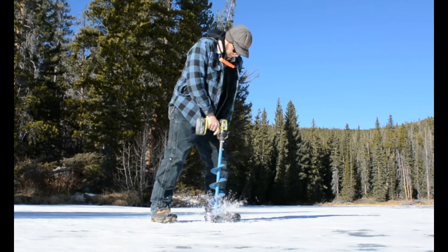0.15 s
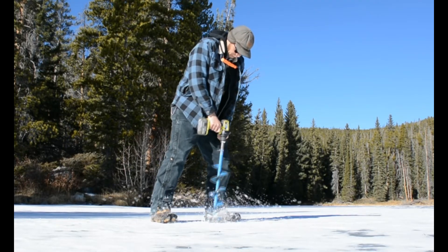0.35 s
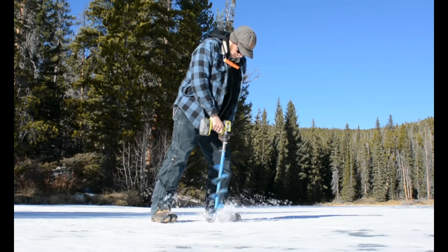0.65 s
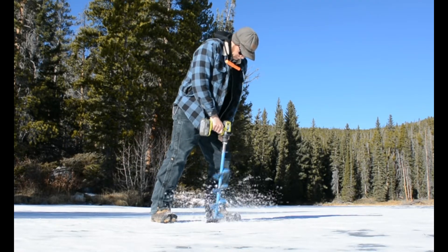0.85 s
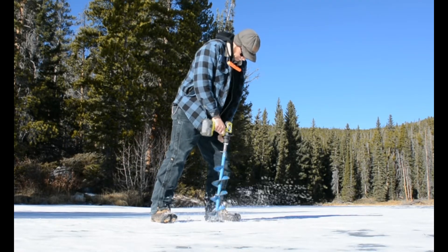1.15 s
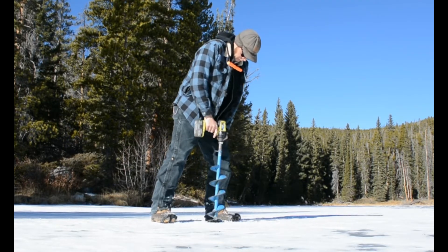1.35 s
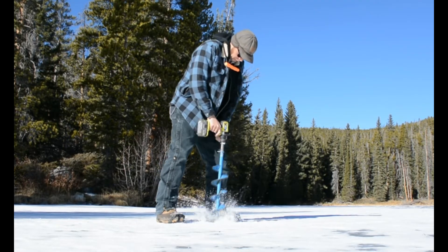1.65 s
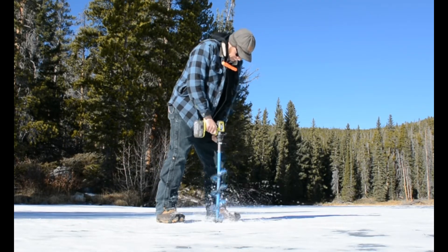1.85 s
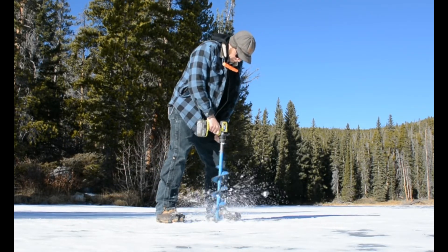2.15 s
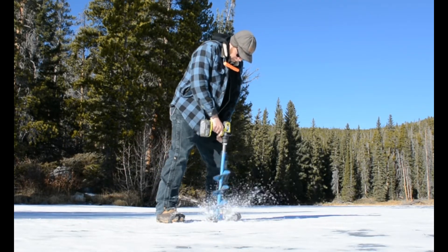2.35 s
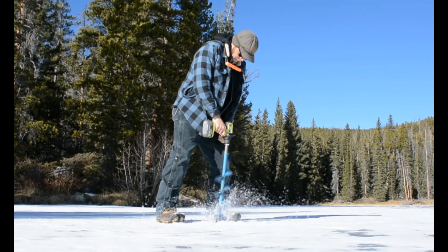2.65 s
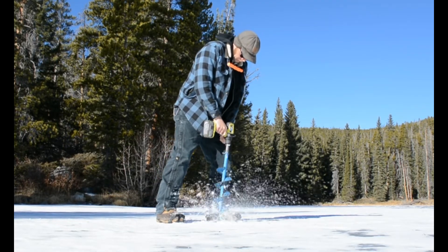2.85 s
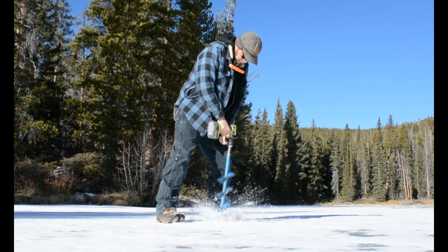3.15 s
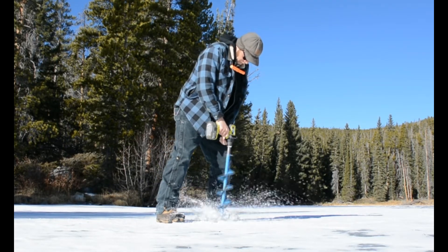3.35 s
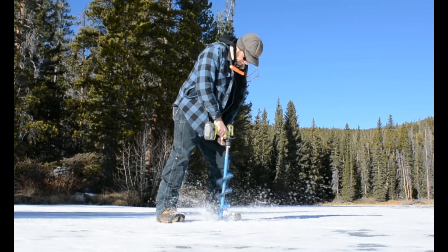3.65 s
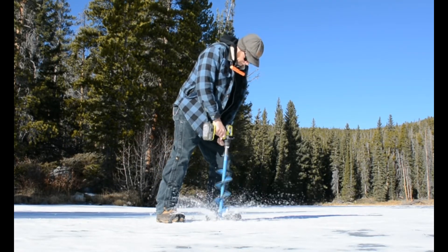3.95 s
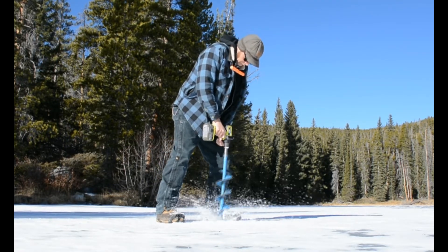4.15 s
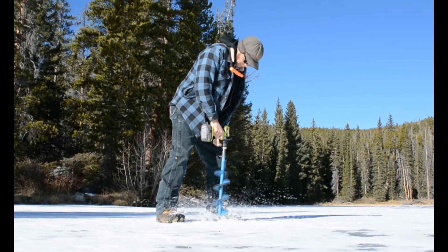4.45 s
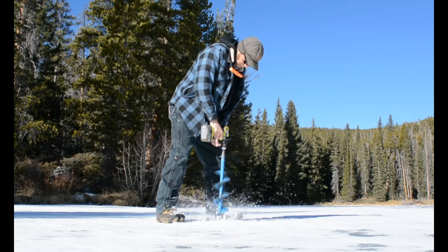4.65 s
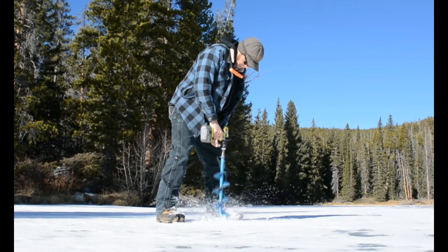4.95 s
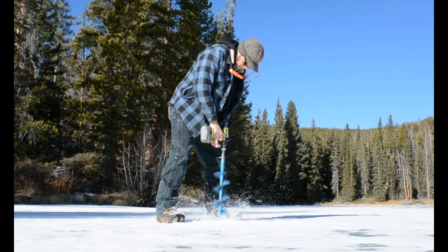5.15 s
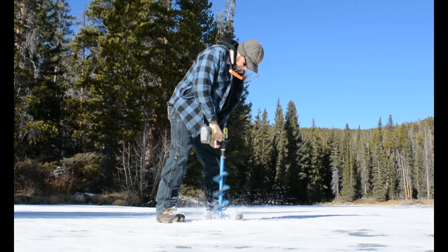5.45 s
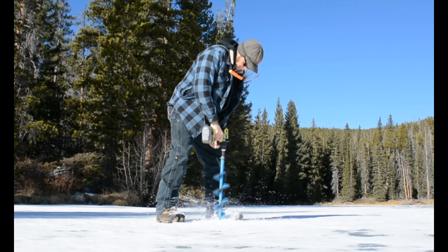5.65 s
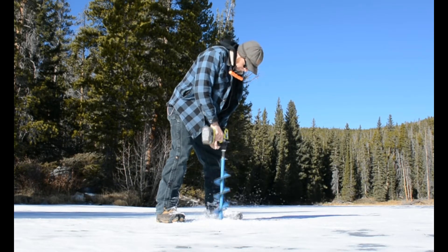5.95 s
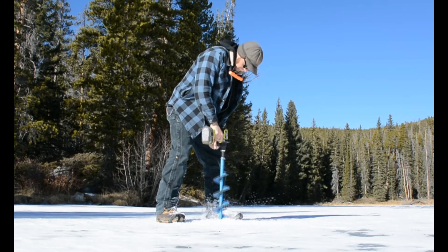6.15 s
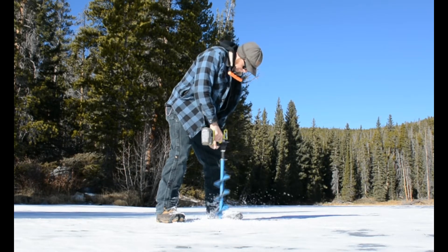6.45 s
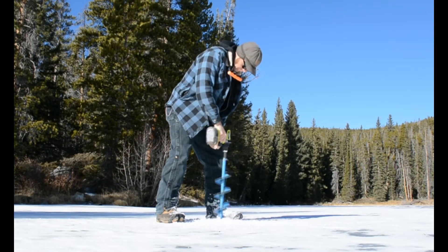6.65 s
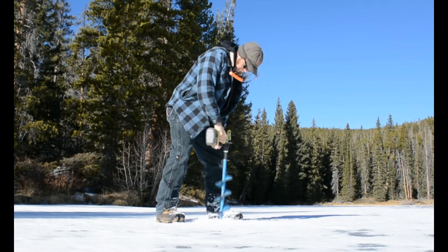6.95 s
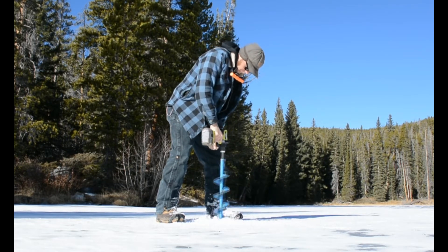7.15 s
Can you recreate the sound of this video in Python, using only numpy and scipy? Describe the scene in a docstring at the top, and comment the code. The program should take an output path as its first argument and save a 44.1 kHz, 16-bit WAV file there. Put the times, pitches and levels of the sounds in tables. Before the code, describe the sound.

A cordless impact drill rattles a steel auger into lake ice, nine short bursts and then one long grinding run, outdoors.

```python
"""On a frozen lake by a forest, a cordless impact drill drives a steel auger into the ice.
The trigger gets nine short pulls, then one long run. The hammer strikes about 88 times a second and rattles
the steel, noise bursts make the shaved ice, and the blades groan as they catch and at each half turn.
The blows ring the air in the hole, lower and lower through the long run.
Clanks, thuds and a shifting boot fill the gaps, and the forest sends back a faint wash."""
import sys
import numpy as np
from scipy import signal
from scipy.io import wavfile

SR = 44100
rng = np.random.default_rng(int(sys.argv[2]) if len(sys.argv) > 2 else 0)


def store_wav(level_fs):
    """Save 16-bit WAV to argv[1]."""
    pcm = np.round(np.clip(np.atleast_2d(level_fs), -1, 1) * 32767)
    wavfile.write(sys.argv[1], SR, pcm.T.astype(np.int16))


N = 321930
T = np.arange(N) / SR  # time of every sample, s

# Levels in the tables are starting points: the functions add their own gains.
# Pulls of the trigger, the last being the long run: pressed t/s, let go t/s, hammer level/dB,
# ice shaving level/dB, hole ring level/dB, change while the finger eases level/dB, starting squeal level/dB
TRIGGER_PULLS = [(-0.1, 0.13, -18.5, -21.5, -27, -6.5, -15.5), (0.234, 0.42, -17.5, -19.5, -29, -10, -15),
                 (0.516, 0.66, -17, -19, -30.5, -4, -13.5), (0.782, 0.93, -17.5, -18.5, -23.5, -2, -14.5),
                 (1.056, 1.074, -25, -17, -23.5, -2, -15.5), (1.429, 1.631, -20.5, -18, -25.5, -1.5, -11.5),
                 (1.772, 1.982, -19, -21, -30.5, -2, -10.5),
                 (2.125, 2.3285, -19.5, -22.5, -26, -4.5, -12.5),
                 (2.45, 2.756, -20, -20.5, -22.5, -0.5, -14), (2.856, 7.4, -20, -19, -21, 3, -14.5)]
# Hammer blows before the load sways them: t/s, blow rate f/Hz
BLOW_RATE_CURVE = [(0, 88), (2.6, 88.5), (3.05, 81), (3.38, 93), (3.9, 87.8), (4.9, 85.5), (5.7, 85.7),
                   (6.4, 89), (7, 89.5), (7.3, 94)]
# The deepening hole: t/s, air resonance before the load sways it f/Hz, lower resonance level/dB,
# boom of the ice sheet level/dB
HOLE_CURVE = [(0, 692, -4, -5.5), (2.25, 710, -6, -5.5), (2.7, 755, -16, -14), (3.6, 747, -27, -19.5),
              (5.0, 680, -37, -28), (5.7, 671, -15.5, -34), (7.3, 659, -7, -17.5)]
# Load at full swing over a half turn: share of the half turn, knock level/dB, chatter level/dB, hole level/dB,
# factor on the hole's pitch, factor on the blow rate
HALF_TURN_LOAD = [(0.02, -3.5, -1, 0, .99, 0.995), (.2, -5, -3, 0.5, .96, .97),
                  (.43, 1.5, 1, -1.2, .99, .985), (.65, 6, -1, 1, 1.09, 1.025),
                  (.85, 1, -1.5, -0.5, 1.05, 1.025)]
# The loose auger clanks in the chuck: t/s, level/dB, decay t/s
CHUCK_CLANKS = [(0.746, -30, 0.026), (1.163, -45, 0.033), (1.211, -30.5, 0.013), (1.365, -32.5, 0.016)]
# Dull thuds on the ice, from a boot or a falling lump: t/s, level/dB
ICE_THUDS = [(1.281, -15.5), (1.286, -22), (1.328, -12), (1.336, -24), (1.516, -15)]
# Modes of the auger and the drill: f/Hz, width f/Hz, level/dB
STEEL_MODES = [(764, 96, 5), (1072, 61, 4), (1191, 54, 7), (1455, 89, 6), (1784, 13, 4), (2103, 266, 5.5),
               (2580, 97, 3), (2880, 170, -5.5), (3640, 90, -6.5), (4734, 145, -4), (6350, 160, -17),
               (7360, 21, -2), (6760, 33, -4.5), (11360, 550, -24)]
# Long rings of the auger's flights: f/Hz, level/dB, time to fall 60 dB t/s
FLIGHT_RINGS = [(829, -2, .45), (1793, -4, .1), (2353, -12, .2), (3278, -14, .2), (4474, -12, .2)]
# Spectrum of ice being shaved: f/Hz, level per Hz/dB
SHAVING_SPECTRUM = [(60, -20), (115, -17), (175, 1.5), (270, 0.5), (430, 0.5), (900, 9.5), (1500, 13),
                    (2600, 10.5), (4000, 4), (5500, 1.5), (7400, -1.5), (8300, -14), (12500, -5.5),
                    (15800, -35)]
# Spectrum of the forest's echo: f/Hz, level per Hz/dB
FOREST_SPECTRUM = [(100, -1.5), (300, 0.5), (800, -13), (2000, -18), (4000, -21), (8000, -22.5),
                   (15000, -23)]
# Spectrum of the still air: f/Hz, level per Hz/dB
AIR_SPECTRUM = [(20, -11), (60, 1), (110, 0.5), (300, -17.5), (900, 2), (2500, -46), (6000, -28),
                (15000, -38)]
# The auger leans and scrapes the wall hard: t/s, level/dB
HARD_SCRAPES = [(3.235, -32), (3.547, -28), (6.115, -28), (6.293, -28.5), (6.582, -24.5), (6.757, -25),
                (6.974, -26), (7.185, -21)]
# Change through the long run as the auger sinks: t/s, hammer level/dB, ice shaving level/dB, hole ring level/dB
SINKING_CURVE = [(2.9, 3, 1.5, 1), (3.3, -1, -3, -3), (4.05, -0.5, -8, 3.5), (4.8, -3, -6.5, 5.5),
                 (5.6, -2.5, -6.5, 6), (6.5, -2.5, -6.5, 5.5), (7.3, -3.5, -4, 4.5)]
# The auger's rotation in the long run: t/s, half turns made
HALF_TURNS_MADE = [(3.02, 0), (3.83, 5), (4.695, 10), (5.6, 15), (6.455, 20), (7.335, 25)]
# Bite of a blade at each half turn, before its unevenness: t/s, level/dB, groan f/Hz
BITE_CURVE = [(3.0, -16, 1330), (3.7, -13, 970), (4.9, -9, 1015), (6.1, -11, 994), (7.2, -11.5, 1230)]
# A blade catches on the fresh ice and groans: t/s, level/dB, groan f/Hz
BLADE_CATCHES = [(0.391, -12, 1650), (1.0774, -14, 1190), (1.4557, -25, 1550), (1.5244, -16, 1260),
                 (2.4894, -9.5, 1490), (2.7312, -14, 1420), (3.1686, -7.5, 1170)]
# The drive squeals as it strains or catches at a touch of the trigger:
# t/s at the loudest, level/dB, f/Hz, length before stretching t/s
DRIVE_STRAINS = [(0.128, -14, 2600, 0.014), (0.405, -14, 2800, 0.014), (2.109, -23.5, 2730, 0.012),
                 (2.848, -23, 2680, 0.018), (3.021, -18, 2280, 0.036), (3.366, -14, 2200, 0.054)]

SPIN_UP_S, COAST_DB_PER_S = 0.014, 437  # the blades come up to speed, and coast to a stop
ENGAGE_S, HAMMER_STOP_DB_PER_S = 0.038, 805  # the hammer needs longer to strike fully, and stops sooner
EASE_S = 0.075  # the finger eases off this long before letting go
DIG_S, DIG_DB = 0.15, 2.5  # the blades dig in gradually, so the shaving swells through each pull
FREE_KNOCK_DB, FREE_CHATTER_DB = -0.5, -3  # until they do, the blows are dry and distinct
UNEVEN_ICE_DB, UNEVEN_ICE_PER_S = 1.63, 45  # the ice gives way unevenly
SQUEAL_DELAY_S, SQUEAL_HZ, SQUEAL_S = 0.017, 2727, 0.036  # after each press; length before stretching
BITE_UNEVEN_DB, BITE_DETUNE = 0.5, 0.026  # spread of the bites
# the flights brush the wall between bites, hardest midway through the run
BRUSH_SHARE, BRUSH_DB, BRUSH_PEAK_S, BRUSH_FADE_DB_PER_S = 0.47, -25, 4.8, 5
EDGE_HZ = 15800  # upper band limit


def amp(db):
    """Decibels to gain."""
    return 10 ** (np.asarray(db) / 20)


def unit(x):
    """Scales to rms 1."""
    return x / np.sqrt(np.mean(x ** 2) + 1e-20)


def curves(rows):
    """Every column of a table of (s, ..) rows, at every sample."""
    s, *columns = np.transpose(rows)
    return [np.interp(T, s, column) for column in columns]


def add(mix, s, sound):
    """Mixes a sound in at time s."""
    part = mix[max(round(s * SR), 0):][:len(sound)]
    part += sound[:len(part)]


def swells(rows, length_s):
    """A rounded swell of gain centred on each (s, dB, ..) row."""
    gain = np.zeros(N)
    for s, db, *_ in rows:
        add(gain, s - length_s / 2, amp(db) * np.hanning(int(length_s * SR)))
    return gain


def wander(per_s):
    """Random drift of rms 1, in straight lines between per_s new values a second."""
    return unit(np.interp(T * per_s, np.arange(N), rng.standard_normal(N)))


def colour(x, points, size=4096):
    """Causal minimum-phase filter with the given (Hz, dB) spectrum and unit energy."""
    hz, db = np.transpose(points)
    bins_hz = abs(np.fft.fftfreq(size, 1 / SR)) + 1
    log_gain = np.log(amp(np.interp(np.log(bins_hz), np.log(hz), db)))
    spectrum = np.exp(np.conj(signal.hilbert(log_gain)))
    taps = np.fft.ifft(spectrum).real[:size // 2]
    return signal.oaconvolve(x, taps / np.linalg.norm(taps))[:len(x)]


def resonate(x, hz, width):
    """A resonance of gain 1, width in Hz, that may follow a curve of hz."""
    r = np.exp(-np.pi * width / SR)
    if np.ndim(hz) == 0:
        return signal.lfilter([1 - r, 0, r - 1], [1, -2 * r * np.cos(2 * np.pi * hz / SR), r * r], x)
    # shift the moving pitch down to zero, smooth, and shift back
    turn = np.exp(2j * np.pi * np.cumsum(hz) / SR)
    return 2 * (turn * signal.lfilter([1 - r], [1, -r], x / turn + 1e-18)).real


def trigger():
    """Gains of knock, chatter, shaving and hole: each pull spins up, digs in, eases off and coasts to a stop."""
    gains = np.zeros((4, N))
    for pressed, let_go, hammer_db, ice_db, hole_db, ease_db, _ in TRIGGER_PULLS:
        held = T - pressed
        after = np.clip(T - let_go, 0, 1)
        free = 1 - np.clip(held / DIG_S, 0, 1) ** 2
        eased_db = ease_db * np.clip((T - let_go) / EASE_S + 1, 0, 1)
        strike_db = hammer_db + eased_db - HAMMER_STOP_DB_PER_S * after
        striking = np.clip(held / ENGAGE_S, 0, 1) * amp(strike_db)
        turning = np.clip(held / SPIN_UP_S, 0, 1) * amp(eased_db - COAST_DB_PER_S * after)
        gains += [striking * amp(FREE_KNOCK_DB * free),
                  striking * amp(FREE_CHATTER_DB * free),
                  turning * amp(ice_db - DIG_DB * free),
                  turning * amp(hole_db)]
    hammer_db, ice_db, hole_db = curves(SINKING_CURVE)
    return gains * amp([hammer_db, hammer_db, ice_db, hole_db])


def load():
    """Gains of knock, chatter and hole, and factors on hole pitch and blow rate, swinging with each half turn."""
    turned = curves(HALF_TURNS_MADE)[0]
    share, *columns = np.transpose(HALF_TURN_LOAD)
    *load_db, pitch, speed = [np.interp(turned, share, c, period=1) for c in columns]
    # the load swings once the blades are well in
    seated = np.interp(T, [3.2, 4.3, 6.8, 7.25], [0.0054, 0.82, 0.95, 0.26])
    gains = amp(seated * np.array(load_db))
    return *gains, 1 + seated * (pitch - 1), 1 + seated * (speed - 1)


def hammer(speed, jitter_s=.00005, loose_s=.0005, uneven_db=2.0):
    """One click a blow, at mean power 1; the timing is less even while the auger is still loose."""
    count = np.floor(np.cumsum(curves(BLOW_RATE_CURVE)[0] * speed) / SR)
    at = np.flatnonzero(np.diff(count))
    late, size = rng.standard_normal((len(at), 2)).T
    slop_s = jitter_s + loose_s * np.interp(at / SR, [2.6, 3.5], [1, 0])
    struck = at + np.round(late * slop_s * SR).astype(int)
    clicks = np.zeros(N)
    clicks[np.clip(struck, 0, N - 1)] = amp(uneven_db * np.clip(size, -2, 1.5))
    return unit(clicks)


def knock(clicks, hz=2350, spread_s=0.00034):
    """The anvil's own knock: about three cycles under a bell-shaped envelope."""
    t = np.arange(-64, 64) / SR
    pulse = -np.cos(2 * np.pi * hz * t) * np.exp(-.5 * (t / spread_s) ** 2)
    return unit(np.convolve(clicks, pulse, "same"))


def rattle(clicks, decay_s=0.0068, steady=0.2):
    """After each blow the loose joints chatter for a few milliseconds, over a little steady noise."""
    burst = signal.lfilter([1], [1, -np.exp(-1 / (decay_s * SR))], clicks)
    return unit((unit(burst) + steady) * rng.standard_normal(N))


def steel(x, size=4096):
    """What the modes of the auger and the drill make of a force, at unit energy."""
    kick = signal.unit_impulse(size)
    ring = sum(amp(db) * resonate(kick, hz, width) for hz, width, db in STEEL_MODES)
    return signal.oaconvolve(x, ring / np.linalg.norm(ring))[:len(x)]


def shaving(per_s=5000, size_db=1.0, lumpy_db=2.5):
    """Ice breaks off the blades in countless small cracks over noise, and comes in clumps."""
    happens = rng.random(N) < per_s / SR
    size = amp(size_db * np.minimum(rng.exponential(1, N), 4))
    cracks = happens * rng.standard_normal(N) * size
    grain = unit(cracks) + 0.83 * rng.standard_normal(N)
    return unit(grain * amp(lumpy_db * wander(130)))


def hole(clicks, chatter, pitch, rough=0.26, churn=0.57, drift=0.016, width_hz=135,
         low_ratio=0.81, low_width_hz=100, boom_hz=262, boom_width_hz=170):
    """Blows, chatter and churning chips ring the air in the hole and make the ice sheet boom."""
    hz, low_db, boom_db = curves(HOLE_CURVE)
    # the root: soft and hard blows stir the air almost alike
    force = unit(np.sqrt(clicks)) + rough * chatter + churn * rng.standard_normal(N)
    air_hz = hz * pitch * (1 + drift * wander(14))  # chips shift in the flights
    air = unit(resonate(resonate(force, air_hz, width_hz), air_hz, 2 * width_hz))
    low_hz = hz * low_ratio
    low = unit(resonate(resonate(force, low_hz, low_width_hz), low_hz, 2 * low_width_hz))
    boom = resonate(resonate(force, boom_hz, boom_width_hz), boom_hz, boom_width_hz)
    boom = unit(signal.sosfilt(signal.butter(4, 235, "high", fs=SR, output="sos"), boom))
    return air + amp(low_db) * low + amp(boom_db) * boom


def tube(clicks, hz=792, width_hz=28, level_db=-7):
    """The blows keep one mode of the auger's tube singing, softer once the ice closes round it."""
    damped_db = np.interp(T, [4.6, 6.0], [0, -4])
    return amp(level_db + damped_db) * unit(resonate(resonate(clicks, hz, width_hz), hz, 6 * width_hz))


def ringing(x):
    """The auger's flights ring on as decaying sines after each sound."""
    t = T[:SR // 2]
    rings = [(db, amp(-60 * t / t60) * np.sin(2 * np.pi * hz * t)) for hz, db, t60 in FLIGHT_RINGS]
    return signal.oaconvolve(x, sum(amp(db) * r / abs(r).sum() for db, r in rings))[:N]


def forest(x, t60=1.35, wet_db=-21, near_db=-13, near_s=0.0034):
    """A quick scatter off the man and the ice, then the long faint wash from the trees."""
    t = T[:int(1.5 * SR)]
    far = rng.standard_normal(len(t)) * amp(-60 * t / t60) * (1 - np.exp(-t / 0.059))
    near = rng.standard_normal(len(t)) * np.exp(-t / near_s) * (t > .002)
    wash = unit(colour(signal.oaconvolve(x, far)[:N], FOREST_SPECTRUM)) * np.std(x)
    scatter = signal.oaconvolve(x, near / np.linalg.norm(near))[:N]
    return amp(wet_db) * wash + amp(near_db) * scatter


def still_air(level_db):
    """The still air on the lake: a steady bed of coloured noise."""
    return amp(level_db) * colour(rng.standard_normal(N), AIR_SPECTRUM)


def cry(hz, width_hz, length_s):
    """A short, fuzzy tone: noise in one narrow resonance that swells and fades."""
    size = int(length_s * SR)
    slips = rng.standard_normal(SR // 4)
    tone = resonate(resonate(slips, hz, width_hz), hz, width_hz)[-size:]
    return unit(tone) * signal.windows.tukey(size, .85)


def squeals(width_hz=330, gain_db=-2, stretch=1.4):
    """The drive squeals just after each press of the trigger, and when it strains."""
    out = np.zeros(N)
    starts = [(pressed + SQUEAL_DELAY_S, db, SQUEAL_HZ, SQUEAL_S)
              for pressed, *_, db in TRIGGER_PULLS if pressed > 0]
    for s, db, hz, length in starts + DRIVE_STRAINS:
        length_s = stretch * length
        add(out, s - length_s / 2, amp(db + gain_db) * cry(hz, width_hz, length_s))
    return out


def half_turns(share=0):
    """The times at which the auger is this share into each half turn."""
    s, made = np.transpose(HALF_TURNS_MADE)
    return np.interp(np.arange(made[-1]) + share, made, s)


def bites():
    """Rows (s, dB, groan Hz): the early catches, then one bite every half turn, no two quite alike."""
    at = half_turns()
    at = at[at > BLADE_CATCHES[-1][0] + .1]
    s, db, hz = np.transpose(BITE_CURVE)
    harder, higher = rng.standard_normal((len(at), 2)).T
    bite_db = np.interp(at, s, db) + BITE_UNEVEN_DB * harder
    groan_hz = np.interp(at, s, hz) * (1 + BITE_DETUNE * higher)
    return BLADE_CATCHES + list(zip(at, bite_db, groan_hz))


def groans(clicks, chatter, width_hz=190, length_s=0.096, gain_db=-8, upper_ratio=1.31, upper_db=-6, rough=1.0):
    """As a blade bites, the blows and chatter ring it in two broad modes."""
    rows = bites()
    hz = curves(rows)[1]
    force = clicks + rough * chatter
    low, high = (unit(resonate(resonate(force, f, width_hz), f, 2 * width_hz)) for f in (hz, hz * upper_ratio))
    return amp(gain_db) * swells(rows, length_s) * (low + amp(upper_db) * high)


def shuffle(s=1.24, level_db=-36, length_s=1.0):
    """A boot shifts in the snow: one slow swell of dull crackle."""
    scuff = colour(shaving(), [(25, -11), (80, 1), (200, -7), (500, 6), (1000, -2),
                               (2500, -11), (6000, -28), (15000, -25)])
    return swells([(s, level_db)], length_s) * scuff


def clanks(bright=1.0):
    """Short rubbing blows of steel on steel and on ice, as decaying noise."""
    force = np.zeros(N)
    t = T[:SR // 6]
    for s, db, decay_s in CHUCK_CLANKS:
        add(force, s, amp(db) * np.exp(-t / decay_s) * rng.standard_normal(len(t)))
    return steel(force) + bright * colour(force, SHAVING_SPECTRUM)


def thuds(hz=330, decay_s=0.00078, crunch=0.93, crunch_s=0.0035):
    """A dull push, heavily damped, with a little crunch."""
    out = np.zeros(N)
    t = T[:SR // 20]
    push = np.sin(2 * np.pi * hz * t) * t / decay_s * np.exp(1 - t / decay_s)
    for s, db in ICE_THUDS:
        grit = colour(rng.standard_normal(len(t)) * np.exp(-t / crunch_s),
                      [(40, 4), (150, 6.5), (600, 10.5), (2000, -5), (4000, -26), (15000, -39)])
        add(out, s - decay_s / 2, amp(db) * (push + crunch * grit))
    return out


def scrapes(length_s=0.069, sing_hz=4980, sing_width_hz=420, sing_db=-2.0, steel_db=3, grit_db=1):
    """Steel rasps along the ice wall, with a thin singing edge."""
    brushes = [(s, BRUSH_DB - BRUSH_FADE_DB_PER_S * abs(s - BRUSH_PEAK_S)) for s in half_turns(BRUSH_SHARE)]
    rasp = shaving()
    sing = unit(resonate(resonate(rasp, sing_hz, sing_width_hz), sing_hz, 2 * sing_width_hz))
    body = amp(steel_db) * steel(shaving())
    grit = amp(grit_db) * colour(shaving(), SHAVING_SPECTRUM)
    return swells(brushes + HARD_SCRAPES, length_s) * (amp(sing_db) * sing + body + grit)


def whine(speed, teeth=36, level_db=-33, flutter=0.0107):
    """The gears whine near a multiple of the blow rate late in the long run, with a fluttering pitch."""
    # the root: the whine sways less with the load than the blows do
    hz = teeth * curves(BLOW_RATE_CURVE)[0] * np.sqrt(speed) * (1 + flutter * wander(200))
    swell = np.interp(T, [5.3, 6.5], [0, 1]) * amp(1.7 * wander(40))
    return amp(level_db) * swell * unit(np.sin(2 * np.pi * np.cumsum(hz) / SR))


def scene(knock_db=-2.5, rattle_db=-1.63, ice_db=0.0, rub_db=-3, hole_db=-3.0, air_db=-47, jolt=0.22):
    """Drill, auger, ice and hole on the open lake."""
    blow, shake, shave, ring = trigger()
    knock_load, chatter_load, hole_load, pitch, speed = load()
    clicks = hammer(speed)
    chatter = rattle(clicks)
    anvil = amp(knock_db) * blow * knock_load * knock(clicks)
    shaken = amp(rattle_db) * shake * chatter_load * chatter
    rubbed = amp(rub_db) * shave * shaving()
    auger = steel(shaken + rubbed)
    uneven = shave * amp(UNEVEN_ICE_DB * wander(UNEVEN_ICE_PER_S))
    chips = unit(shaving() + jolt * rattle(clicks))  # each blow jolts the blades on
    cutting = amp(ice_db) * colour(uneven * chips, SHAVING_SPECTRUM)
    hollow = amp(hole_db) * ring * hole_load * (hole(clicks, chatter, pitch) + tube(clicks))
    drill = anvil + whine(speed) + squeals() + clanks()
    blades = cutting + groans(clicks, chatter) + scrapes()
    dry = drill + auger + blades + hollow + thuds() + shuffle()
    return (dry + ringing(dry) + forest(dry) + still_air(air_db))[None]


def record(dry):
    """The highest peaks are rounded off; then the band limit."""
    soft = dry / (1 + dry ** 4) ** .25
    low_pass = signal.firwin(511, EDGE_HZ, window=("kaiser", 9), fs=SR)
    return signal.oaconvolve(soft, low_pass[None], "same", axes=1)


dry = scene()
out = record(dry)
store_wav(out)
```